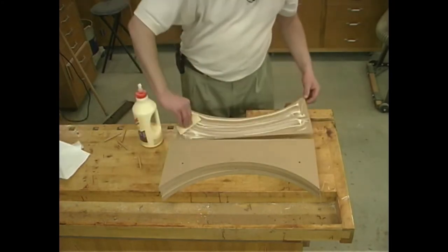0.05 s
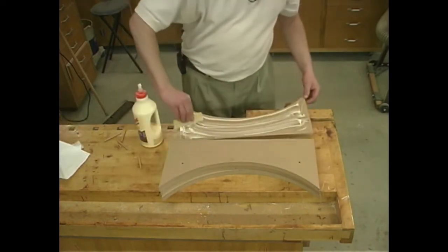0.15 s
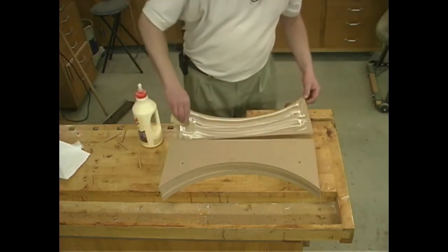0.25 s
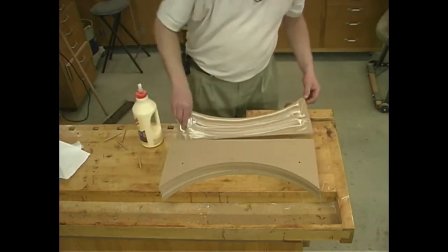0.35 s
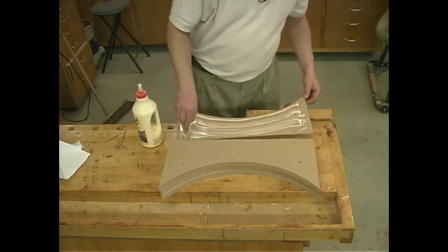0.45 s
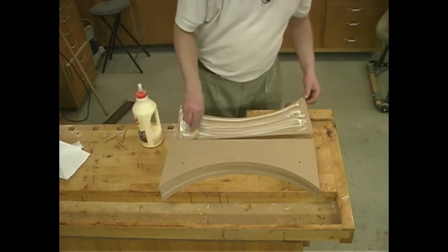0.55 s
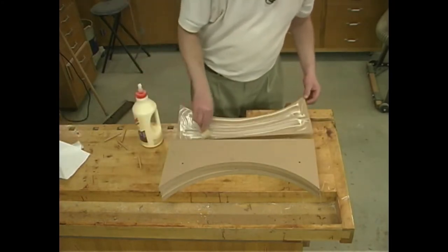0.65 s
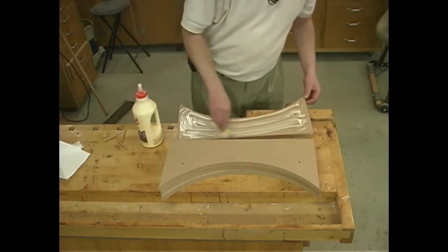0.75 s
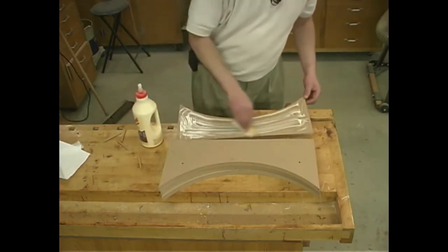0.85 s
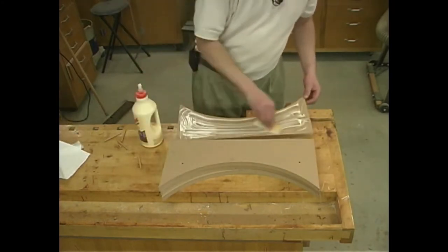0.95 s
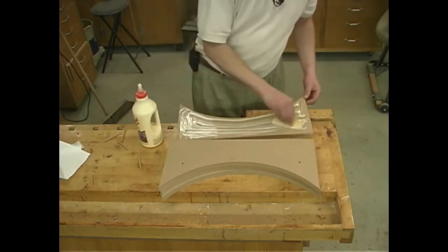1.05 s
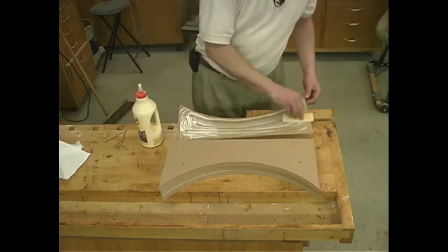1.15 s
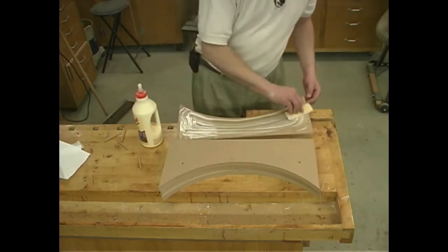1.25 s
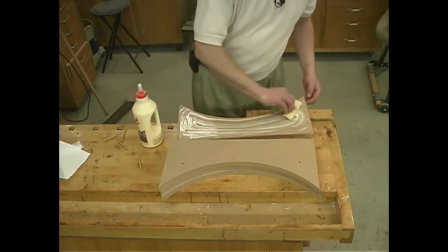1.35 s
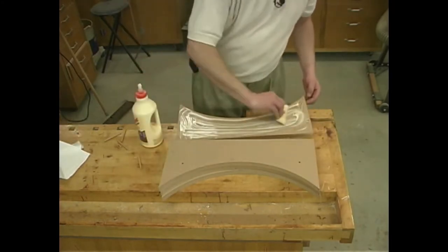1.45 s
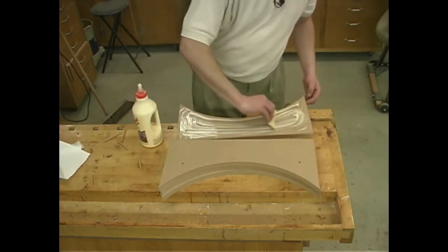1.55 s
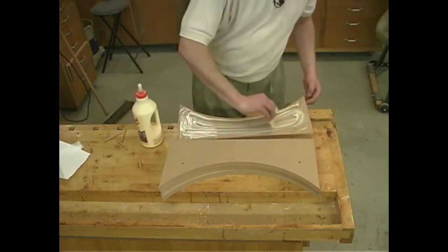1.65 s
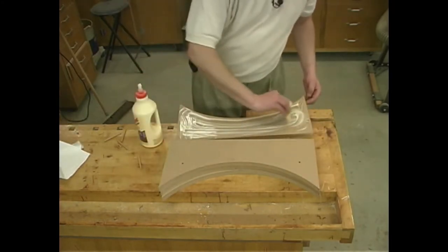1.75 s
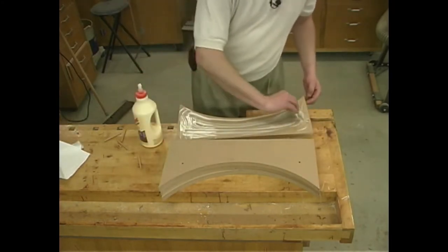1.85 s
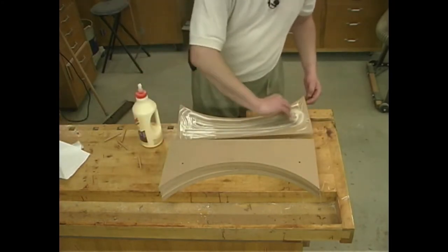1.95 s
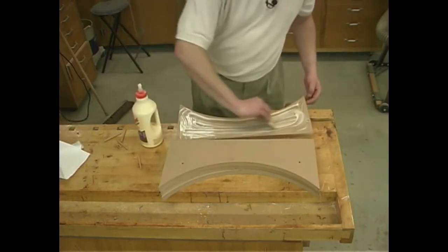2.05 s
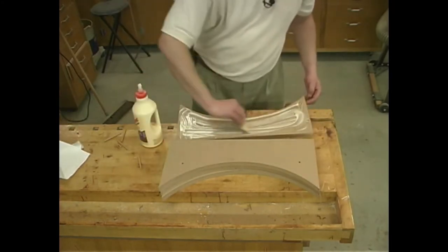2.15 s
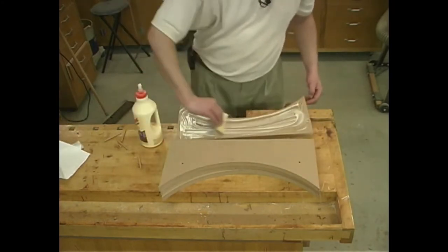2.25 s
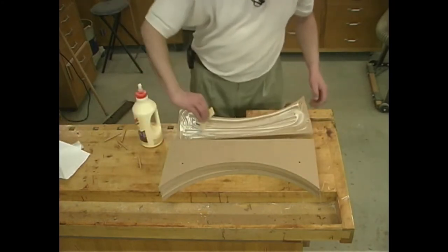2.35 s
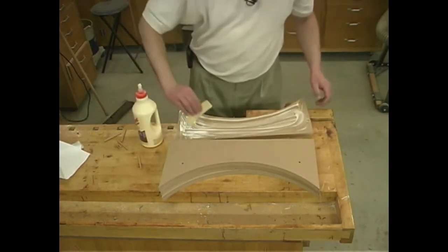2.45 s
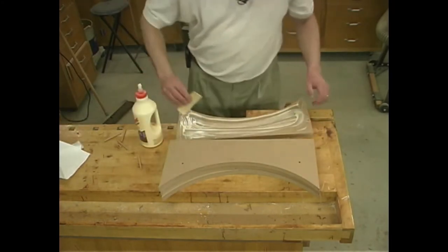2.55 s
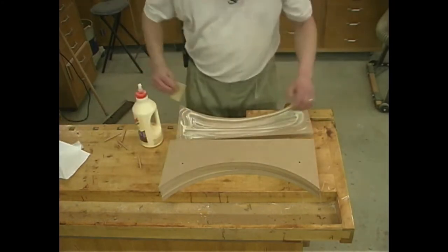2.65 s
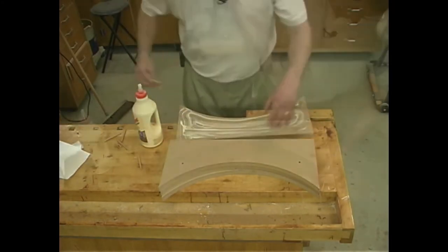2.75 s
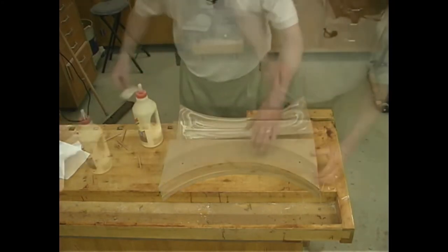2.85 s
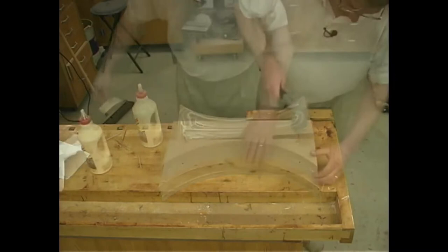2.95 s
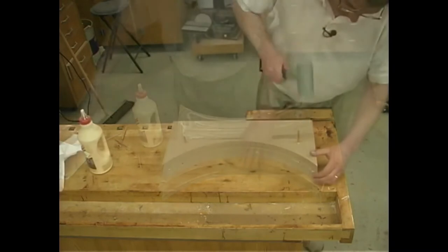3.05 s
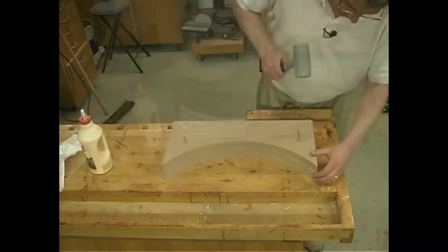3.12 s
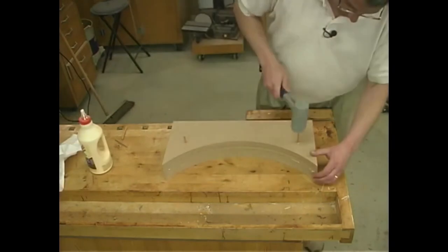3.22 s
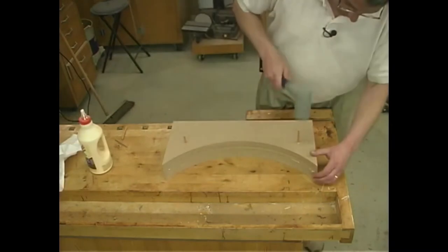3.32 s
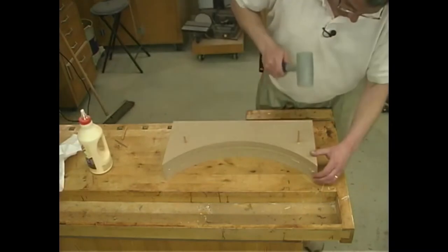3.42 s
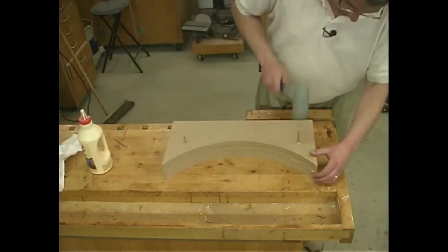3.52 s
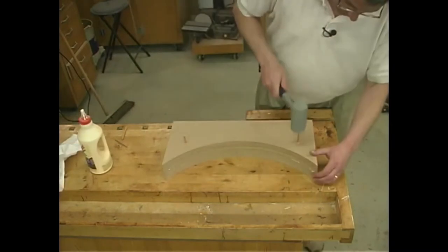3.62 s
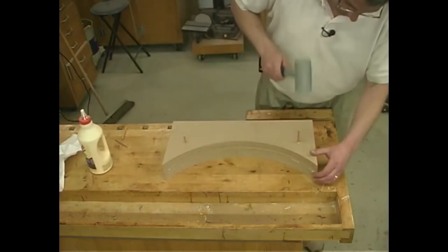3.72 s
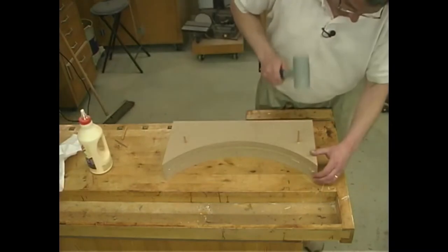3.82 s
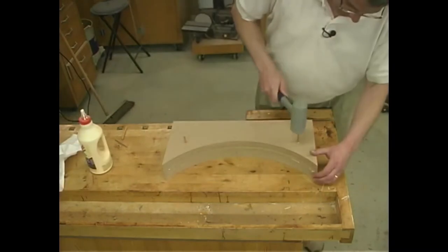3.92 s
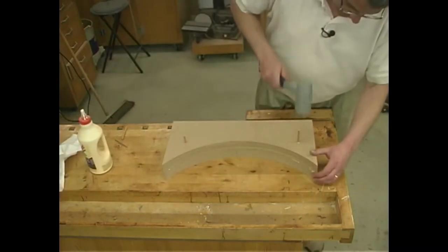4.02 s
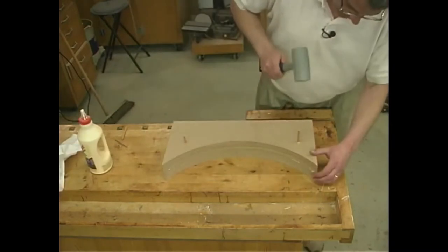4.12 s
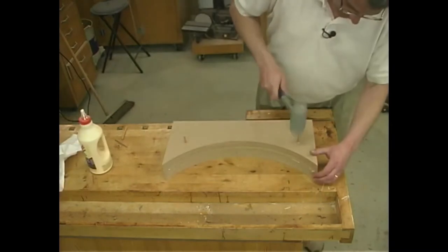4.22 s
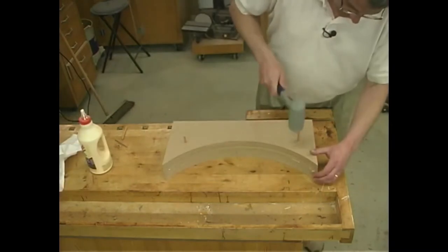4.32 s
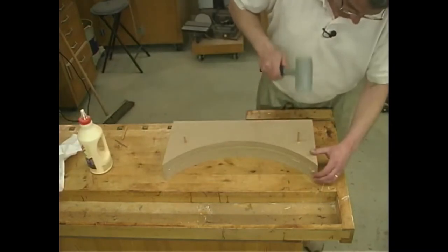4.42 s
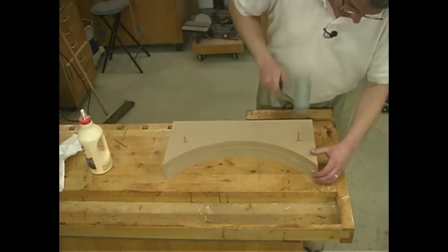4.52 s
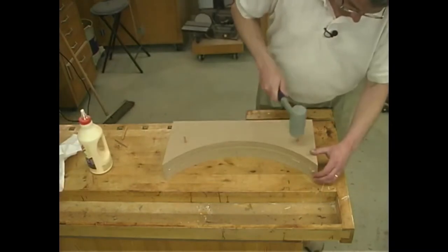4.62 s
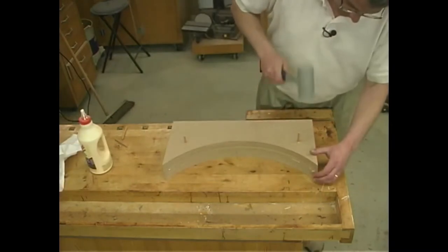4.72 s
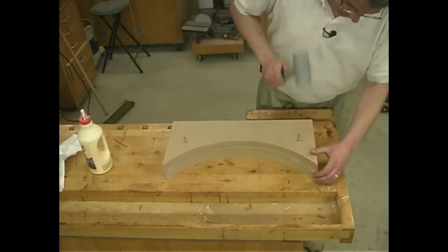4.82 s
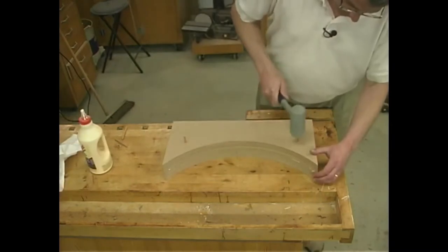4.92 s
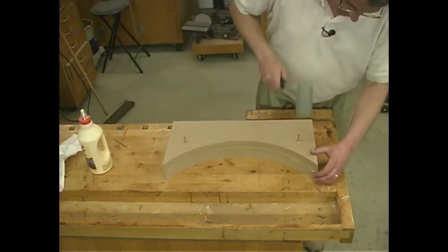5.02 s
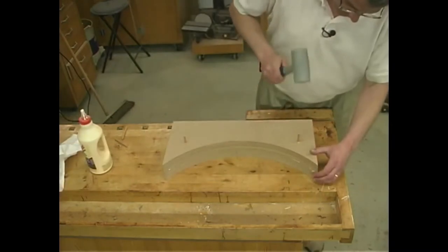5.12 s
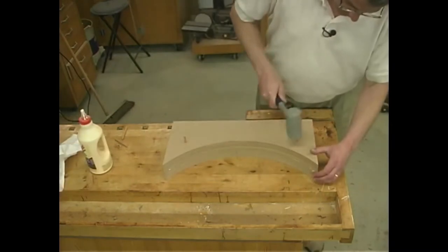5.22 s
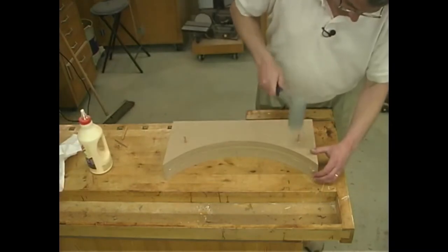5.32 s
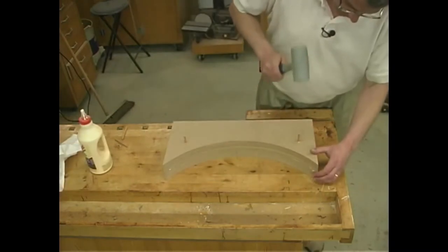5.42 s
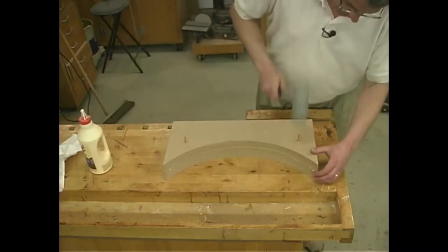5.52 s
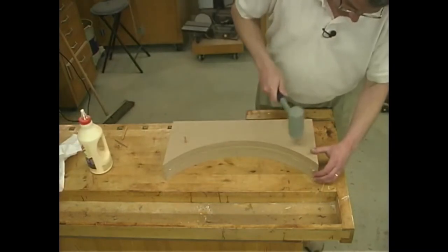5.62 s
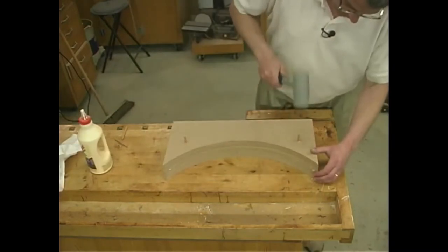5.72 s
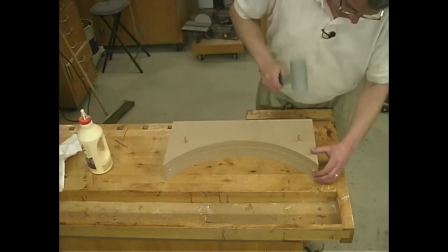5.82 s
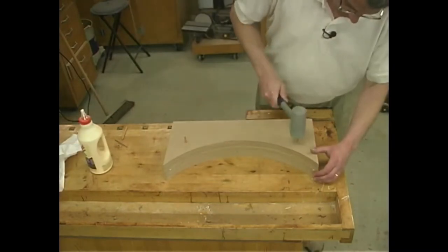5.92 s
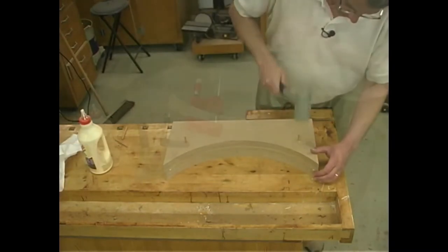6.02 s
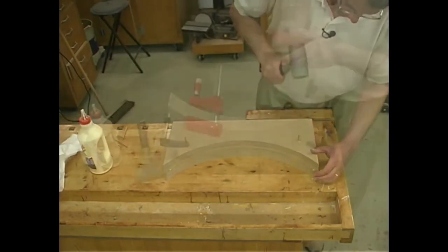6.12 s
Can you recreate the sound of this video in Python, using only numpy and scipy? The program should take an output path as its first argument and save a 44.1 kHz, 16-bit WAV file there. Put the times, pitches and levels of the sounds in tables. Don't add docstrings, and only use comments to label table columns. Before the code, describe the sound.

Faint card scrapes and tiny ticks over a low room hum, then a mallet knocks a wooden dowel in quick, even, ringing blows.

```python
import sys
import numpy as np
from scipy import signal
from scipy.io import wavfile

SR = 44100
rng = np.random.default_rng(int(sys.argv[2]) if len(sys.argv) > 2 else 0)


def magnitude_from_level(level_db):
    exponent = np.asarray(level_db, float) / 20
    return 10 ** exponent


def wav_out(sig):
    wavfile.write(sys.argv[1], SR, np.round(np.clip(np.atleast_2d(sig).T, -1, 1) * 32767).astype(np.int16))


N = 271920
CUT_S = 3.2


def rms_one(x):
    return x / np.sqrt(np.mean(x ** 2) + 1e-20)


def at_hz(points, hz):
    table_hz, values = np.array(points).T
    return np.interp(np.log(hz), np.log(table_hz), values)


def ring(clicks, hz, t60):
    r, w = magnitude_from_level(-60 / (t60 * SR)), 2 * np.pi * hz / SR
    return signal.lfilter([0, np.sin(w)], [1, -2 * r * np.cos(w), r * r], clicks + 1e-18)


def resonate(x, hz, width):
    r = np.exp(-np.pi * width / SR)
    feedback = [1, -2 * r * np.cos(2 * np.pi * hz / SR), r * r]
    return signal.lfilter(np.array([1, 0, -1]) * (1 - r * r) / 2, feedback, x)


def swells(starts, holds, levels_db, rise_s, fall_s):
    t = np.arange(N) / SR - np.array(starts)[:, None]
    rise = 1 - np.exp(-np.maximum(t, 0) / rise_s)
    fall = np.exp(-np.maximum(t - np.array(holds)[:, None], 0) / fall_s)
    return magnitude_from_level(np.array(levels_db)) @ (rise * fall)


def add_at(out, start_s, sound):
    i = round(start_s * SR)
    out[..., i:i + sound.shape[-1]] += sound


# start_s, bench_db, then board_db, dowel_db and crack_db relative to the bench
BLOWS = [(2.637, -24.5, -13, -17, -17.5), (2.936, -27, -3.5, -19, -7.5), (3.269, -16, 0, -22.5, -21.5),
         (3.594, -11.5, 2, -13, -17), (3.932, -12, 2, -7, -10.5), (4.2753, -20.5, .5, -9, -3.5),
         (4.603, -19, 1, -10.5, -6), (4.929, -13, 1.6, -10, -9.5), (5.256, -13, 5, -4, -9),
         (5.594, -12.5, 4, -3, -9), (5.932, -10, 4.5, -3.5, -9)]
PART_HZ = [200, 580, 1500, 4500]


def colour_db(hz):
    return np.array([bench_db + np.interp(np.log(hz), np.log(PART_HZ), [0, *parts_db])
                     for start, bench_db, *parts_db in BLOWS])


# pitch_hz, level_db, t60_s, late_s
WOOD = [(69.5, -17, 0.36, 0.016), (139.3, -4, 0.33, 0.0039), (159, -6, 0.21, 0.0035),
        (267.3, -9.5, 0.2, 0.00788), (295, -1, 0.098, 0.00809), (328.3, 2, 0.076, 0.00894),
        (455, 1, 0.037, 0.003286), (503, 1, 0.057, 0.002864), (646, -2.5, 0.094, 0.002873),
        (841, -1.5, 0.018, 0.001944), (1107, -7, 0.039, 0.00074), (1450, -7, 0.17, 0.0011),
        (1700, 8, 0.021, 0.00065), (2029, -1, 0.085, 0.001482), (2910, 1.5, 0.0094, 0.0006),
        (3730, 0, 0.018, 0.000922), (4720, -6.5, 0.0096, 0.00107)]


def mallet(spread_db, detune, crack_db, crack_s):
    out, t = np.zeros(N + SR), np.arange(SR // 4) / SR
    knock_db = 6.5 - 0.82 * np.array(BLOWS)[:, 2]
    knock_db[0] -= 18
    share_db = np.array([colour_db(hz) + knock_db for hz, *rest in WOOD]).T
    crack_band = signal.butter(2, [900, 5500], "band", fs=SR, output="sos")
    for (start, bench_db, *rest, over_bench_db), shares in zip(BLOWS, share_db):
        knock = np.zeros(len(t))
        for k, ((hz, level_db, t60, late_s), share) in enumerate(zip(WOOD, shares)):
            strength, grip, late = rng.standard_normal(3)
            click = np.arange(len(t)) == round(late_s * (1 + .25 * abs(late)) * SR)
            mode = ring(click, hz * (1 + detune * grip), t60)
            knock += (-1) ** k * magnitude_from_level(share + level_db + spread_db * strength) * mode
        splinters = rng.standard_normal(len(t)) * t / crack_s * np.exp(-t / crack_s)
        knock += magnitude_from_level(bench_db + over_bench_db + crack_db) * signal.sosfilt(crack_band, splinters)
        add_at(out, start, knock)
    return out[:N]


def bending_wave():
    from_hz, to_hz, sweep_s, dies_s = 1444, 274, 0.00375, 0.005
    out, t = np.zeros(N + SR), np.arange(SR // 20) / SR
    for start, bench_db, board_db, dowel_db, crack_db in BLOWS[1:]:
        hz = (to_hz + (from_hz - to_hz) * np.exp(-t / sweep_s)) * (1 + .06 * rng.standard_normal())
        sweep = np.sin(2 * np.pi * np.cumsum(hz) / SR) * np.exp(-t / dies_s)
        add_at(out, start, magnitude_from_level(bench_db + 4.5 + 0.83 * crack_db) * sweep)
    return out[:N]


def head_ring():
    head_hz, width_hz, t60_s = 2070, 170, 0.48
    start, bench_db, board_db = np.transpose(BLOWS)[:3]
    note = rms_one(resonate(resonate(rng.standard_normal(N), head_hz, width_hz), head_hz, 2 * width_hz))
    level_db = -35.5 + 5.4 * (bench_db + 14.5) - 3.6 * np.maximum(board_db, 0)
    return note * swells(start, 0 * start, level_db, rise_s=0.0043, fall_s=t60_s / np.log(1000))


# pitch_hz, delay_s, spread_s, level_db over the board
RETURNS = [(525.3, .055, .016, -6.5), (581, 0.07, 0.0077, -9), (645, 0.093, .02, -11)]


def wall_returns():
    out, t = np.zeros(N + SR), np.arange(SR // 4) / SR
    swell = np.zeros(len(t))
    for hz, delay, spread, level_db in RETURNS:
        bump = np.exp(-.5 * ((t - delay) / spread) ** 2)
        swell += magnitude_from_level(level_db) * bump * np.sin(2 * np.pi * (hz * t + rng.random()))
    for start, bench_db, board_db, dowel_db, crack_db in BLOWS:
        add_at(out, start, magnitude_from_level(bench_db + board_db + 0.55 * dowel_db) * swell)
    return out[:N]


# pitch_hz, side_db relative to the middle
WIDTH = [(60, -33), (500, -74), (1400, -27), (3000, -18.5), (6000, -2.5), (15000, 1)]


def noise_bands(spectrum, size):
    edges = 18 * 2 ** np.arange(0, 10.1, .5)
    white = rng.standard_normal((2, 2, size))
    for k, (low, high) in enumerate(zip(edges, edges[1:])):
        band_pass = signal.butter(2, [low, high], "band", fs=SR, output="sos")
        mid, side = signal.sosfilt(band_pass, white[k % 2])
        hz = np.sqrt(low * high)
        yield hz, magnitude_from_level(at_hz(spectrum, hz)) * (mid + magnitude_from_level(at_hz(WIDTH, hz)) * side * [[1], [-1]])


# pitch_hz, t60_s
ROOM_T60 = [(60, 1), (160, .5), (420, 0.84), (1100, 0.8031), (2900, 0.8174), (7700, 0.68), (14000, 2)]
# pitch_hz, level_db
ROOM_TONE = [(25, -28), (60, -19.5), (105, -14), (150, -4.5), (210, -2.5), (320, -3), (600, -10),
             (850, -7.5), (1400, 3.5), (2100, 1), (2700, -3), (3600, -5), (7000, -28), (15000, -67)]
# pitch_hz, width_hz, added_db
ECHO_PEAKS = [(162, 6.7, 5.5), (198.3, 16, -8.5), (342.3, 19, 1), (504.4, 53, -4), (524, 72, 2),
              (647, 118, 7.5), (864, 57, 2), (926, 33, 3.5), (1115, 17, 6), (1430, 50, -13.5),
              (1658, 8.7, 5), (1910, 780, -21), (3570, 430, 1.5), (5160, 620, -1)]


def echo_of_blows(gap_s, turns, same):
    out, t = np.zeros((2, N + SR)), np.arange(SR) / SR
    for hz, band in noise_bands(ROOM_TONE, size=N + SR):
        build_up = 1 - np.exp(-t / (gap_s + turns / hz))
        shape = build_up * magnitude_from_level(-60 * t / at_hz(ROOM_T60, hz)) / np.sqrt(hz)
        for (start, *rest), level_db in zip(BLOWS, colour_db(hz)):
            i = round(start * SR)
            pattern = same * band[:, :SR] + band[:, i:i + SR]
            add_at(out, start, magnitude_from_level(level_db) * shape * pattern)
    echo = magnitude_from_level(28.5) * out[:, :N]
    return echo + sum(magnitude_from_level(db) * resonate(echo, hz, width) for hz, width, db in ECHO_PEAKS)


# pitch_hz, width_hz, level_db
CARD_TONES = [(1600, 1500, -1.5), (2550, 820, -0.5), (3110, 860, 0.5), (4400, 370, -3.5), (7250, 1100, -8)]
# start_s, hold_s, level_db, brightness_db
STROKES = [
    (0.762, 0.036, -60.5, -5),
    (0.817, .14, -67, -9),
    (0.959, 0.1, -52, 1.5),
    (1.055, 0.12, -54.5, -6.5),
    (1.203, .24, -72, -6),
    (1.6, 0.033, -60, -25),
    (2.093, 0.14, -63.5, -12),
    (2.214, 0.045, -55.5, 2.5),
    (2.267, 0.79, -67, -12),
]


def card_scrape(grit_db, per_s, clump_db):
    starts, holds, stroke_db, bright_db = np.transpose(STROKES)
    dull = swells(starts, holds, stroke_db, rise_s=0.024, fall_s=0.017)
    bright = swells(starts, holds, stroke_db + bright_db, rise_s=0.024, fall_s=0.017)
    s = np.arange(N) / SR
    sizes = magnitude_from_level(grit_db * np.minimum(rng.exponential(1, N), 5)) * rng.choice([-1, 1], N)
    grit = sizes * (rng.random(N) < per_s / SR)
    tones = []
    for hz, width, level_db in CARD_TONES:
        clump = magnitude_from_level(clump_db * np.interp(s, np.linspace(0, s[-1], 300), rng.standard_normal(300)))
        tones.append(magnitude_from_level(level_db) * clump * rms_one(resonate(resonate(grit, hz, width), hz, width)))
    return dull * magnitude_from_level(-5) * tones[0] + bright * magnitude_from_level(-10) * sum(tones[1:])


# start_s, peak_db, pitch_hz, width_hz, length_s
TICKS = [(0.48, -46, 250, 404, 0.0026), (0.484, -55.5, 2070, 1400, 0.0079), (0.74, -61, 1600, 500, 0.0033),
         (0.78, -58.5, 3200, 500, 0.018), (0.963, -54.5, 4400, 600, 0.037), (1.055, -52, 1700, 400, 0.026),
         (1.146, -61, 4400, 1500, 0.022), (1.328, -60.5, 3400, 1960, 0.012), (1.468, -61, 70, 30, 0.02),
         (1.523, -61, 1670, 300, 0.0071), (1.597, -57, 1600, 400, 0.014), (1.621, -53, 1600, 796, 0.0051),
         (2.234, -60, 3440, 2150, 0.024)]


def card_ticks():
    out, t = np.zeros(N), np.arange(SR // 5) / SR
    for start, peak_db, hz, width, length in TICKS:
        rasp = rms_one(resonate(resonate(rng.standard_normal(len(t)), hz, width), hz, 2 * width))
        add_at(out, start, magnitude_from_level(peak_db + 1.5) * rasp * (1 - np.exp(-t / 0.001)) * np.exp(-t / length))
    return out


# start_s, hold_s, level_db
SHOVES = [
    (0, 0.038, -67),
    (0.466, .02, -66),
    (0.758, .4, -77.5),
    (1.206, 0.225, -66.5),
    (1.78, 0.21, -73),
    (2.074, 0.061, -67),
    (2.192, 0.025, -63),
    (2.28, 0.59, -64),
]


def form_rub():
    rub = rms_one(ring(rng.standard_normal(N), 330, 0.0031))
    return rub * swells(*np.transpose(SHOVES), rise_s=0.027, fall_s=0.042)


def near_room(x, t60):
    t = np.arange(SR // 2) / SR
    mid, side = rng.standard_normal((2, len(t))) * magnitude_from_level(-60 * t / t60)
    echo = mid + 0.69 * side * [[1], [-1]]
    return signal.fftconvolve(x[None], echo / np.sqrt(np.sum(mid ** 2)), axes=1)[:, :N]


# pitch_hz, density_db per Hz
AIR = [(15, -43), (30, 5), (56, 6.5), (110, -6), (200, -13.5), (450, -13), (700, -15.5), (1500, -18),
       (5000, -20.5), (7400, -26.5), (12000, -51)]
# pitch_hz, level_db rms
HUM = [(59.2, -76), (242.2, -82), (300.5, -84), (360.7, -78), (419.9, -82), (479.1, -78), (721.4, -87),
       (958.2, -88)]


def background():
    t = np.arange(N) / SR
    air = magnitude_from_level(-67) * rms_one(sum(band for hz, band in noise_bands(AIR, size=N)))
    lines = [np.sqrt(2) * magnitude_from_level(db) * np.sin(2 * np.pi * (hz * t + rng.random())) for hz, db in HUM]
    hum = magnitude_from_level(1.5) * sum(lines)
    high_pass = signal.butter(6, 7000, "high", fs=SR, output="sos")
    hiss = signal.sosfilt(high_pass, rng.standard_normal(N))
    fade_db = np.where(t < CUT_S, np.interp(t, [2.6, CUT_S], [0, -3]), -12)
    hiss_db = np.where(t < CUT_S, -68, -73.5)
    return magnitude_from_level(fade_db) * (air + hum) + magnitude_from_level(hiss_db) * hiss


def scene():
    blows = magnitude_from_level(-4.5) * mallet(spread_db=1.56, detune=0.0066, crack_db=11.5, crack_s=0.0014)
    echo = echo_of_blows(gap_s=0.00026, turns=7.1, same=2.524)
    driving = blows + bending_wave() + head_ring() + wall_returns() + echo
    card = card_scrape(grit_db=-1.5, per_s=3000, clump_db=5.5) + card_ticks() + form_rub()
    fade_in = np.interp(np.arange(N) / SR, [2.313, CUT_S], [0, 1])
    mix = fade_in * driving + card + magnitude_from_level(-9) * near_room(card, t60=1.0) + background()
    return mix * magnitude_from_level(np.array([[-.27], [.27]]))


def top_cut(x):
    return signal.sosfilt(signal.butter(12, 16790, fs=SR, output="sos"), x)


def record(dry):
    over_db = np.maximum(20 * np.log10(np.abs(dry).max(axis=0) + 1e-9) + 9, 0)
    release_db = 40 * np.arange(N) / SR
    held_db = np.maximum.accumulate(over_db + release_db) - release_db
    duck_db = signal.lfilter([.03], [1, -.97], held_db)
    limited = .58 * np.tanh(dry * magnitude_from_level(-.6 * duck_db) / .58)
    low_pass = signal.ellip(10, .3, 60, 15900, fs=SR, output="sos")
    return top_cut(signal.sosfilt(low_pass, limited))


dry = scene()
out = record(dry)
wav_out(out)
```